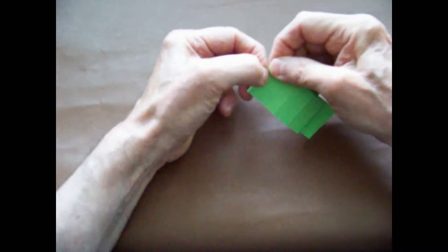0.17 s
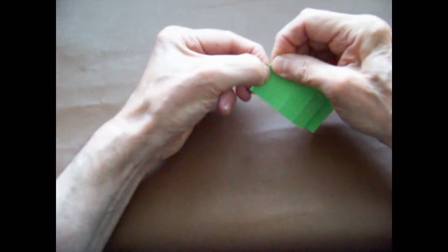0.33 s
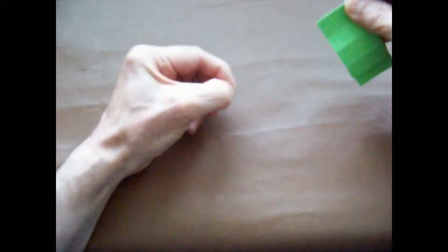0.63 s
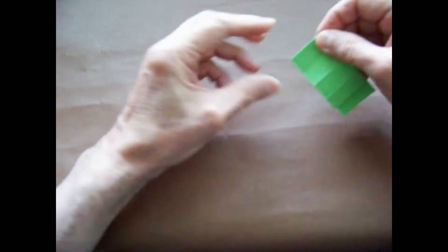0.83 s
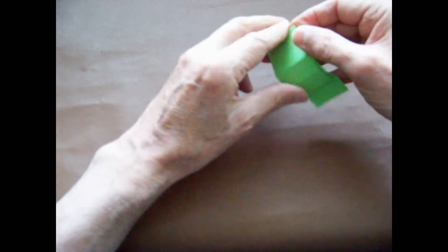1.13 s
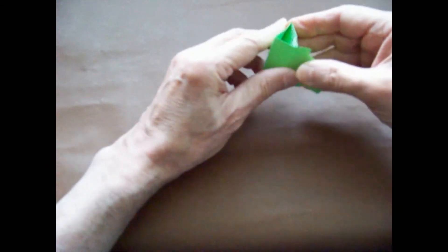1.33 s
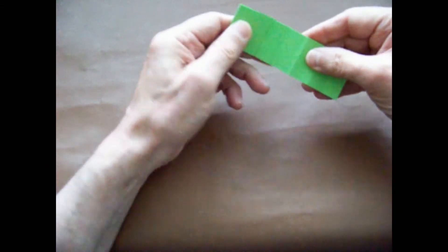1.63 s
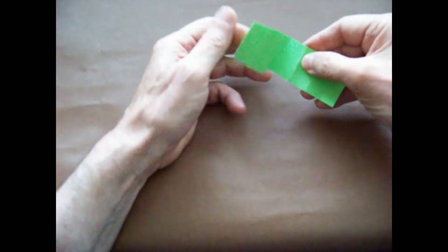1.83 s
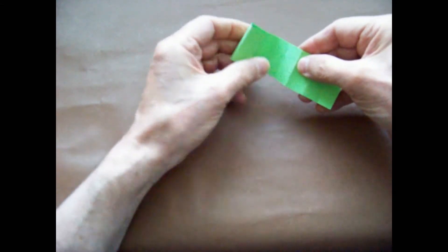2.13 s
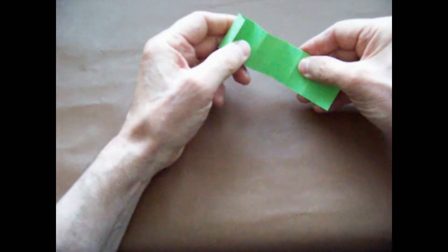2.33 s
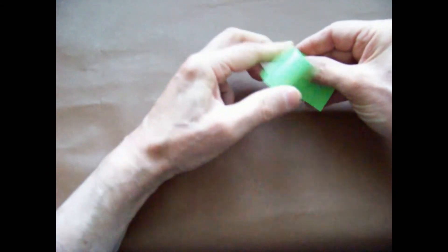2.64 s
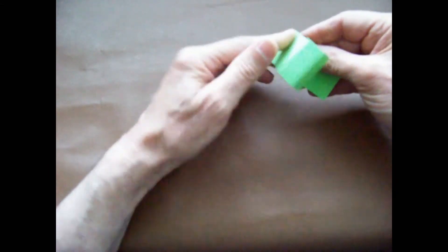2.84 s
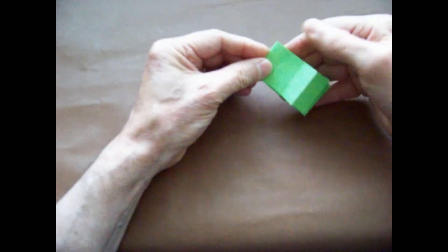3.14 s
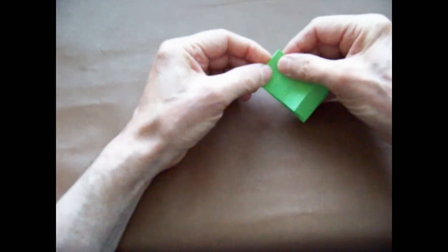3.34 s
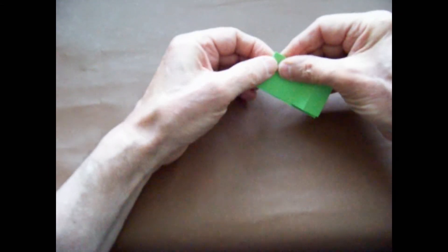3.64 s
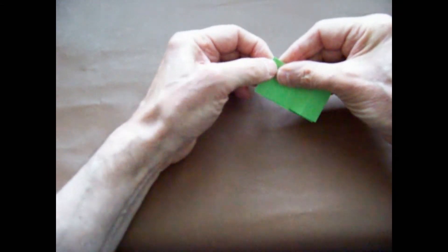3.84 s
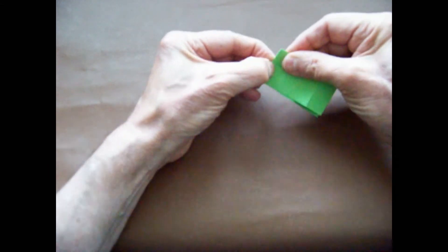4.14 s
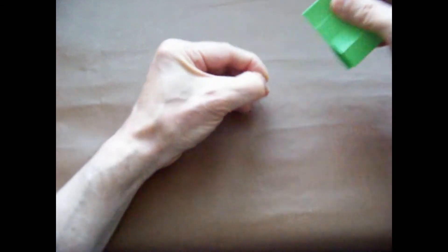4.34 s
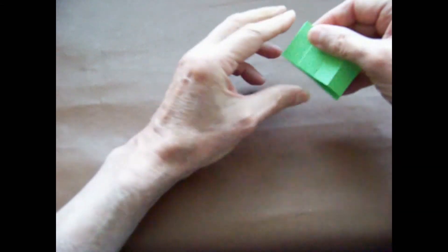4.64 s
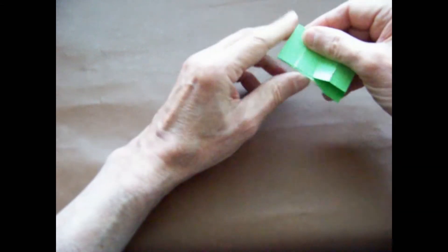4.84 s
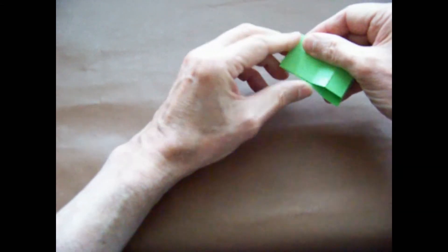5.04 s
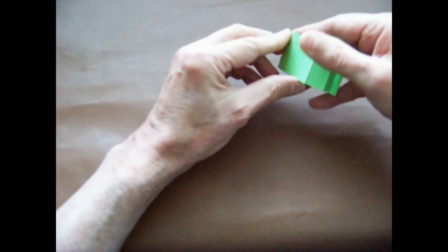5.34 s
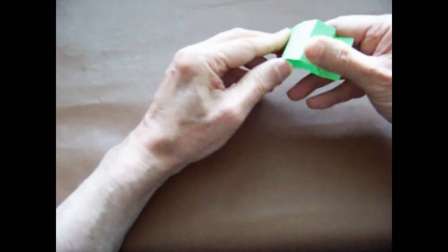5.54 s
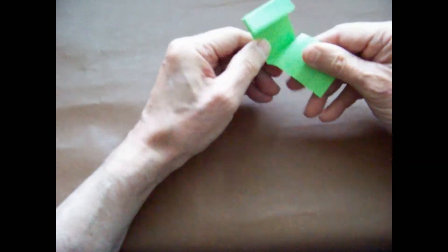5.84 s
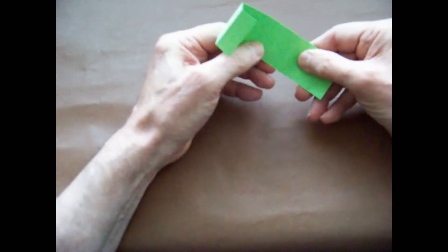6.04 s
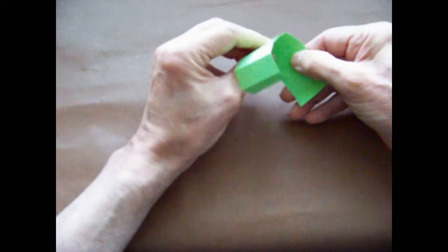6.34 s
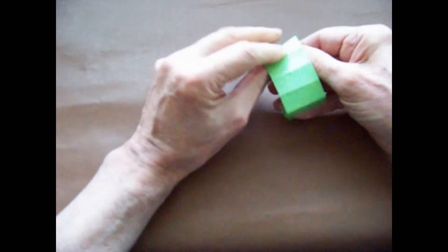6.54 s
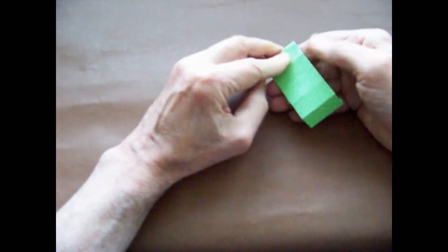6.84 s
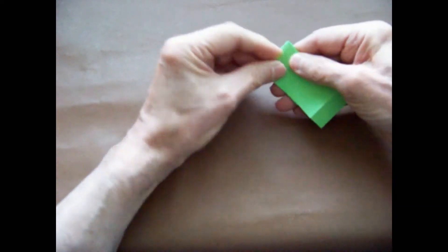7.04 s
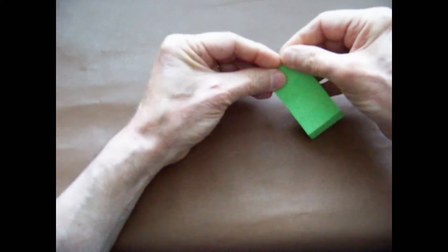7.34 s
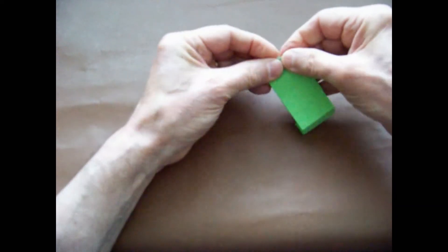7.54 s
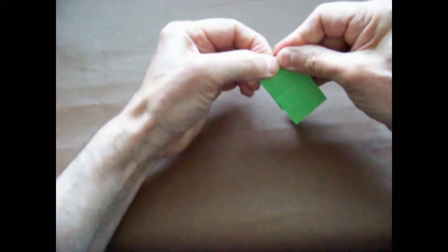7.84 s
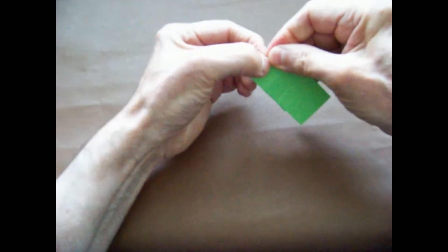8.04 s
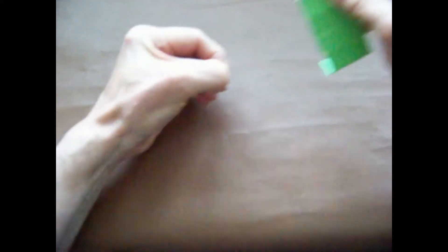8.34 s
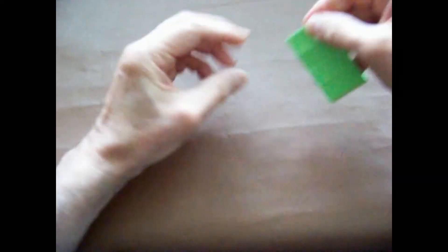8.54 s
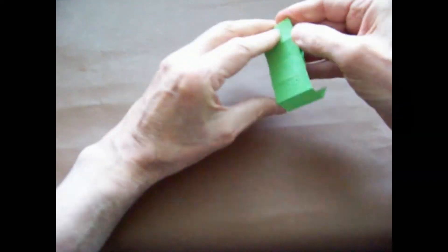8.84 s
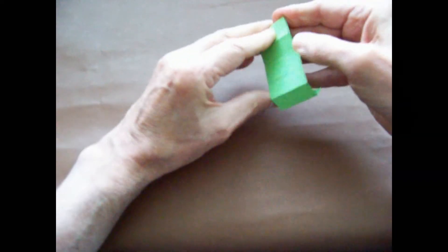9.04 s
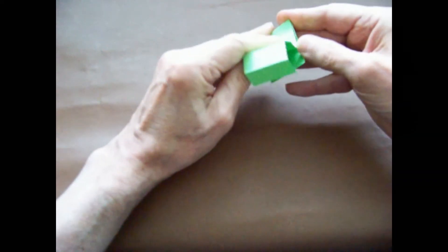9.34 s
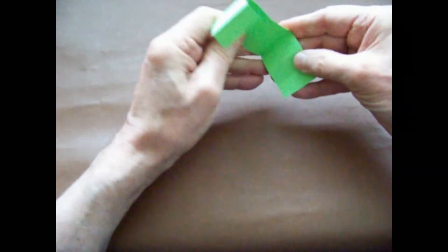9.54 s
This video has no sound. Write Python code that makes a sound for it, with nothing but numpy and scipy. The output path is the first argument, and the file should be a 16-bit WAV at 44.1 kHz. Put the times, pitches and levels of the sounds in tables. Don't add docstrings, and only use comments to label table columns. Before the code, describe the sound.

A small stiff card is folded by two hands, close to a stereo microphone in a quiet room with faint hiss, rumble and hum. Light gritty rubs and ticks open, with a crisp snap at 0.6 s and a soft low push just after. From 1.2 to 3 s fingers scrape and scuff, with small clicks near 1.6, 2.3 and 2.6. A loud bright crack lands at 3.2, then lighter ticks around 3.6. The sharpest snap comes at 4.35 with a low bump; another follows at 4.9, and a hard one at 5.64 amid brisk scuffs. Rustling and nail rubs continue to 6.7, a crack at 6.9, small crackly ticks from 7.3 to 7.8. A strong snap at 8.36 is followed by quieter handling, then a final crack at 9.54 trailing into a dry scuff. Echoes are short; the loudest snaps slightly overload.

```python
import sys
import numpy as np
from scipy import signal
from scipy.fft import rfft, irfft, next_fast_len
from scipy.io import wavfile
from scipy.ndimage import uniform_filter1d

SR = 44100
rng = np.random.default_rng(int(sys.argv[2]) if len(sys.argv) > 2 else 0)


def gain_from_db(level_db):
    decades = np.asarray(level_db, float) / 20
    return 10 ** decades


def transcribe(signal):
    frames = np.atleast_2d(signal).T
    limited = np.clip(frames, -1, 1)
    pcm = np.round(limited * 32767).astype(np.int16)
    wavfile.write(sys.argv[1], SR, pcm)


N = 426888


def rms_one(x):
    return x / np.sqrt(np.mean(x ** 2) + 1e-20)


def in_time(rows):
    s, *columns = np.transpose(rows)
    return [np.interp(np.arange(N) / SR, s, c) for c in columns]


def at_hz(points, hz):
    table = np.array(points)
    return np.interp(np.log(hz), np.log(table[:, 0]), table[:, 1])


def drift(rate_hz):
    r = np.exp(-80 * np.pi * rate_hz / SR)
    noise = rng.standard_normal(N // 40 + 2002)
    slow = signal.lfilter([1], [1, -2 * r, r * r], noise)[2000:]
    return np.interp(np.arange(N) / 40, np.arange(len(slow)), rms_one(slow))


def resonate(x, hz, width_hz):
    r = np.exp(-np.pi * width_hz / SR)
    zeros = np.array([1, 0, -1]) * (1 - r * r) / 2
    return signal.lfilter(zeros, [1, -2 * r * np.cos(2 * np.pi * hz / SR), r * r], x)


def body(x, modes):
    return sum((-1) ** k * gain_from_db(db) * resonate(x, hz, width) for k, (hz, width, db) in enumerate(modes))


def band(x, low_hz, high_hz):
    return signal.sosfilt(signal.butter(2, [low_hz, high_hz], "band", fs=SR, output="sos"), x)


def pair(mid, side, alike):
    alike = np.clip(alike, 0, 1)
    return np.sqrt(1 + alike) * mid + np.sqrt(1 - alike) * side * np.array([[1], [-1]])


# time_s, level_db
RUMBLE_CURVE = [(0.0, -72.5), (7.7, -71.5), (8.0, -69), (8.75, -66), (9.0, -71)]
# pitch_hz, density_db_per_hz
FLOOR_SPECTRUM = [(88, -32), (150, -8), (247, -15), (281, -50), (373, -6.5), (613, -8), (958, -7),
                  (1230, -11.5), (1330, -9.5), (5280, -16), (7850, -31.5), (10200, -64), (17300, -120)]
# pitch_hz, width_hz, level_db
HUM_LINES = [(54.7, 11, -77.5), (116.5, 4.4, -73.5), (186.3, 4.2, -72), (223.2, 8.2, -74.5)]
# pitch_hz, likeness_0to1
HISS_LIKENESS = [(60, 0.66), (200, 0.71), (670, 0.36), (2220, 0.14), (7400, 0.12)]
HISS_DB, RUMBLE_TRIM_DB = -60.5, 7.0


def stillness():
    hiss = 0
    edges_hz = 140 * 2 ** np.arange(0, 6.1, 1 / 3)
    white = rng.standard_normal((2, 2, N))
    for k, (low_hz, high_hz) in enumerate(zip(edges_hz, edges_hz[1:])):
        hz = np.sqrt(low_hz * high_hz)
        level_db = at_hz(FLOOR_SPECTRUM, min(hz, 5200)) + 1.6 * drift(13)
        hiss = hiss + gain_from_db(level_db) * pair(*band(white[k % 2], low_hz, high_hz), at_hz(HISS_LIKENESS, hz))
    rumble = pair(*band(rng.standard_normal((2, N)), 7, 130), 0.44)
    hum = 0
    for hz, width_hz, db in HUM_LINES:
        line = resonate(rng.standard_normal((2, N)), hz, width_hz)
        hum = hum + gain_from_db(db) * rms_one(pair(*line, 0.74))
    rumble_db = in_time(RUMBLE_CURVE)[0] + RUMBLE_TRIM_DB
    return gain_from_db(HISS_DB) * rms_one(hiss) + gain_from_db(rumble_db) * rms_one(rumble) + hum


# time_s, rub_db
GRIP_CURVE = [(0.0, -61.5), (0.95, -69), (1.15, -62), (2.1, -60), (2.5, -63), (2.9, -61), (3.3, -57),
              (3.65, -53.5), (3.8, -58), (4.15, -56), (4.4, -62.5), (6.1, -63), (7.25, -56), (7.95, -69),
              (8.08, -62), (8.25, -71), (9.0, -63), (9.68, -60.5)]
# let_go_s, top_db, length_s, nail_re_rub_db
DRAG_STROKES = [(0.071, -46, 0.042, -5), (0.282, -48.5, 0.18, -7), (0.516, -42.5, 0.032, -17),
                (1.295, -51, 0.12, -1.5), (1.622, -44.5, 0.023, 18.5), (1.873, -48.5, 0.095, 11.5),
                (1.961, -40.5, 0.048, -10), (2.606, -40.5, 0.038, -9), (2.798, -44.5, 0.081, -10),
                (3.112, -47, 0.17, 4), (4.366, -43, 0.19, 3.5), (4.912, -35, 0.051, -10),
                (5.222, -49, 0.13, -2), (5.295, -44, 0.052, 2.5), (5.629, -44, 0.064, 4),
                (5.813, -42.5, 0.062, 4), (6.036, -42.5, 0.12, -5), (6.065, -41, 0.031, -2),
                (5.938, -53, 0.03, -2.2), (6.407, -52, 0.038, -11), (6.914, -38, 0.045, 0),
                (7.183, -42.5, 0.064, 5), (7.358, -45, 0.08, 0.5), (7.449, -42.5, 0.068, -1),
                (7.716, -44.5, 0.065, -7), (7.84, -46, 0.047, -1), (8.981, -50, 0.052, -5),
                (9.528, -47.5, 0.2, -2), (9.547, -28.5, 0.032, -1)]
# start_s, top_db, fall_20db_s, flex_re_rub_db
SPRING_BACKS = [(0.284, -52.5, 0.13, -3), (0.7, -43, 0.16, 2), (0.811, -47, 0.07, 7.5),
                (2.302, -44.5, 0.0357, 8), (2.606, -35.5, 0.06, -4.5), (3.175, -38, 0.12, -14),
                (3.706, -50, 0.07, 8.5), (4.347, -36.5, 0.17, -1.5), (4.91, -36.5, 0.0563, -1),
                (5.657, -50, 0.6, -5), (6.914, -59, 0.9, 0), (7.034, -46, 0.07, -5), (7.448, -45, 0.03, 7),
                (7.723, -62, 0.3, 9), (7.826, -52, 0.08, 1), (8.365, -39.5, 0.12, -4),
                (8.483, -49.5, 0.18, -7.5), (8.783, -42, 0.05, -8), (9.086, -50.5, 0.13, -6.5),
                (9.548, -42.5, 0.12, -6.5)]
# start_s, level_db, length_s, flex_re_rub_db, nail_re_rub_db
EDGE_SLIDES = [(0.376, -49.5, 0.011, -16, -7), (0.393, -49, 0.007, -16, -5), (0.402, -46, 0.0073, -15, -11),
               (0.544, -44.5, 0.18, -8.5, -5), (1.295, -48.5, 0.073, -14, -1), (1.392, -41, 0.024, -22, -3),
               (1.413, -41.5, 0.2, -16, -5), (1.619, -53.5, 0.15, -13, -3.5),
               (1.943, -53.5, 0.11, -1.5, -4), (2.142, -55.5, 0.095, -1.5, -1.5),
               (3.13, -58.5, 0.036, 3, -14), (4.576, -61, 0.1, 6.5, -14), (4.663, -53.5, 0.1, -9, -3),
               (5.29, -50.5, 0.071, -7, -10), (5.367, -58, 0.17, -27, -8), (5.621, -32.5, 0.032, -23, -4),
               (5.81, -60, 0.054, 2, -10), (5.854, -38, 0.057, -15, -1), (6.226, -54.5, 0.11, -9, -1.5),
               (6.398, -49, 0.071, -7, -1.5), (6.478, -47, 0.11, -9.5, -10), (6.654, -49, 0.032, -12, -10),
               (6.785, -43.5, 0.091, -13.5, -2), (7.527, -48.5, 0.11, -5.5, -4),
               (8.289, -41, 0.079, -14, -1.3), (9.62, -51, .08, -10, 0.5)]
GRIP_FLEX_DB, GRIP_NAIL_DB = -2.5, -3
DRAG_RISE_DB, DRAG_FLEX_DB, SETTLE_NAIL_DB = 11.5, -10, -4


def strokes():
    t = np.arange(N) / SR
    power = gain_from_db(2 * (in_time(GRIP_CURVE)[0] + np.array([[0], [GRIP_FLEX_DB], [GRIP_NAIL_DB]])))
    ramps = [(s - length, length, db - DRAG_RISE_DB, db, DRAG_FLEX_DB, nail)
             for s, db, length, nail in DRAG_STROKES]
    ramps += [(s, 2 * fall_s, db, db - 2 * 20, flex, SETTLE_NAIL_DB) for s, db, fall_s, flex in SPRING_BACKS]
    ramps += [(s, length, db, db, flex, nail) for s, db, length, flex, nail in EDGE_SLIDES]
    for s, length_s, start_db, end_db, flex_db, nail_db in ramps:
        on = slice(max(round(s * SR), 0), max(round((s + length_s) * SR), 0))
        rub_db = start_db + (end_db - start_db) * (t[on] - s) / length_s
        power[:, on] += gain_from_db(2 * (rub_db + np.array([[0], [flex_db], [nail_db]])))
    rub_db, sheet_db, nail_db = uniform_filter1d(10 * np.log10(power), size=260, axis=1)
    return rub_db, sheet_db - rub_db, nail_db - rub_db


def crackle():
    sizes = gain_from_db(3.5 * np.minimum(rng.exponential(1, N), 4)) * rng.choice([-1, 1], N)
    pops = uniform_filter1d(sizes * (rng.random(N) < 450 / SR), size=3)
    patches_hz = np.geomspace(1300, 6500, 12)
    dealt = np.repeat(rng.integers(0, 12, N // 64 + 1), 64)[:N]
    return rms_one(sum(resonate(pops * (dealt == k) + 1e-18, hz, .11 * hz) for k, hz in enumerate(patches_hz)))


# pitch_hz, width_hz, level_db
CARD_MODES = [(2840, 1666, 10.5), (3291, 2085, 12.5), (4800, 3260, 10), (6100, 4350, 5)]
# pitch_hz, width_hz, level_db
SHEET_MODES = [(190, 480, -15.5), (464, 100, -22), (760, 450, 5.5), (1050, 1070, 8.5), (1597, 1220, 5)]


def rubbing():
    rub_db, flex_db, nail_db = strokes()
    sizes = gain_from_db(0.3 * np.minimum(rng.exponential(1, N), 5))
    caught = rng.random(N) < 7000 / SR
    grit = pair(*rng.standard_normal((2, N)), 0.44) * (sizes * caught + 0.48)
    grit = rms_one(grit) * gain_from_db(1.6 * drift(60))

    def ring(modes):
        return rms_one(sum(gain_from_db(db + 3.2 * drift(26)) * resonate(grit, hz, .6 * width) for hz, width, db in modes))

    dull_db = 10 * np.log10(np.clip(1 - gain_from_db(2 * nail_db), .1, 1))
    panels = gain_from_db(dull_db) * ring(CARD_MODES[:2]) + gain_from_db(nail_db - 0.16) * ring(CARD_MODES[2:])
    for low_hz in (2180, 2180, 2000):
        panels = band(panels, low_hz, 22000)
    sound = panels + gain_from_db(flex_db + 0.3) * band(ring(SHEET_MODES), 120, 5200)
    pops = crackle()
    sound = sound + gain_from_db(-9.0) * band(pops, 2500, 9000) + gain_from_db(flex_db - 7.0) * band(pops, 600, 3000)
    return gain_from_db(rub_db - 0.1) * sound * gain_from_db(np.array([[1.3], [-1.3]]))


# start_s, peak_db, ring_hz, buckle_ms
SLOW_SLIPS = [(0.056, -41, 1840, 1.14), (0.243, -40.5, 5400, 4.1), (0.262, -44, 5570, 2.9),
              (0.492, -40, 2290, 3.7), (0.745, -35, 3000, 4.4), (0.6137, -25.5, 4100, 2.5),
              (1.619, -26, 4150, 4.12), (2.075, -45, 1800, 3.8), (2.622, -24, 2780, 4.3),
              (2.775, -41.5, 3350, 3.8), (3.178, -15, 2690, 4.9), (3.357, -33.5, 3100, 3.3),
              (3.725, -43, 4630, 4.2), (4.505, -39.5, 4170, 4.9), (4.834, -46.5, 4350, 1.6),
              (4.928, -23, 3320, 3.5), (5.195, -42.5, 2560, 2.8), (5.633, -23, 3000, 5.6),
              (5.65, -25, 4370, 3.4), (5.773, -29.5, 3080, 3.6), (5.828, -35, 3570, 1.1),
              (5.924, -38, 3030, 2), (6.907, -32, 5900, 3.8), (7.044, -36.5, 1400, 2.55),
              (7.434, -27, 6170, 3.7), (7.5432, -36, 2000, 0.95), (7.641, -28, 6270, 4.7)]
# start_s, peak_db, ring_hz, ring_re_crack_db, buckle_ms
CREASE_CRACKS = [(0.547, -29.5, 1380, -3, 1.9), (1.6094, -26.5, 6100, -2, 4.4), (2.05, -40.5, 1520, 2, 2.8),
                 (2.155, -28.5, 2650, 1, 2.3), (2.583, -33.5, 1350, 3.5, 2.3), (3.174, -12.5, 2620, 5, 2.2),
                 (3.219, -15, 5020, -20, 1.1), (3.2456, -25.5, 2440, -2, 1.33), (3.35, -30, 1230, 0, 1.95),
                 (4.168, -34, 5170, -27, 2.7), (4.35, -19.5, 5450, -3.5, 2.7), (4.7335, -38, 4800, 4, 2.8),
                 (4.914, -16.5, 1490, 0.5, 1.53), (5.311, -31, 2160, -10.5, 1.23),
                 (5.328, -35, 2180, -5, 2.6), (5.6226, -26.5, 2860, 3, 0.97), (5.638, -15.5, 3680, 4, 1.65),
                 (6.645, -44.5, 1450, 2, 2.3), (6.868, -19, 2940, -7, 6.0), (7.342, -36.5, 4570, -2, 8.0),
                 (7.372, -27, 3060, -6, 10.7), (7.531, -37, 3320, 0, 3.4), (7.69, -37, 5450, 1, 4.4),
                 (7.806, -38, 6300, 2, 3.2), (8.362, -18, 760, -13.5, 2.73), (8.84, -42, 1430, -4, 2.7)]
# start_s, peak_db, ring_hz, ring_re_crack_db, buckle_ms
PANEL_TICKS = [(0.381, -40, 3420, 4, 2.45), (0.475, -46, 3500, 6, 2.3), (0.613, -19.5, 6200, 14, 2.2),
               (1.398, -40, 3300, 7, 2.6), (1.891, -40, 5070, 6, 2.3), (3.608, -31, 4440, 3, 3.3),
               (3.667, -29.5, 2960, 20, 1.6), (4.295, -25, 4200, 13, 4), (4.546, -38.5, 3680, 3.5, 1.2),
               (4.577, -38, 1760, 18, 2.2), (4.667, -39, 4440, 12, 2), (4.688, -33.5, 4440, 7, 2.3),
               (4.989, -26.5, 4400, -1, 3.8), (5.282, -31.5, 4770, 4.5, 2.35), (5.741, -31, 4440, 5, 2.5),
               (5.8043, -25.5, 3620, 14, 4.6), (6.7105, -28.5, 4680, 12, 1.1), (7.031, -37, 3300, 6, 2),
               (7.429, -27, 6640, 8, 5.3), (7.577, -32.5, 3300, 8, 0.83), (7.631, -27, 6600, 4, 5.3),
               (9.516, -43, 4800, 7, 1.5)]
# start_s, peak_db, ring_hz, thump_re_ring_db
SHEET_THUDS = [(0.31, -39, 1390, 11), (0.689, -34, 2330, -6), (0.811, -43, 2340, -4),
               (2.301, -23.5, 2580, -8.5), (2.545, -37, 5770, -6.5), (3.037, -40.5, 5400, -1),
               (3.142, -39, 3440, -8), (3.653, -34, 2840, 0), (3.703, -32, 1560, 10),
               (4.209, -37, 2890, -4), (4.8757, -28.5, 5660, -6.5), (5.112, -39.5, 4700, -3),
               (5.237, -36, 2310, 7), (5.575, -35.5, 3820, -15), (5.761, -32, 3550, -23),
               (5.784, -28.5, 3300, -11), (5.862, -35.5, 6040, -7.5), (6.343, -39, 1950, 7),
               (6.486, -41, 1430, -2.5), (7.133, -39, 6000, -5.5), (7.256, -42.5, 1810, 0),
               (7.725, -35, 2780, -0.5), (7.824, -29, 2100, -3.5), (8.119, -44, 1410, 0),
               (8.285, -31.5, 2940, -4), (8.783, -42, 3380, -5), (8.959, -40, 1260, 11),
               (9.536, -23.5, 5100, -15)]
SLIP_THUMP_DB, SLIP_RING_DB = -21, -0.5
CRACK_THUMP_DB, TICK_THUMP_DB = -24, -18
THUD_MS, THUD_RING_DB = 2.3, 4.5


def buckles():
    slips = [(s, db, hz, SLIP_THUMP_DB, ms, SLIP_RING_DB) for s, db, hz, ms in SLOW_SLIPS]
    quick = [(s, db, hz, CRACK_THUMP_DB, ms, ring) for s, db, hz, ring, ms in CREASE_CRACKS]
    quick += [(s, db, hz, TICK_THUMP_DB, ms, ring) for s, db, hz, ring, ms in PANEL_TICKS]
    quick += [(s, db, hz, thump, THUD_MS, THUD_RING_DB) for s, db, hz, thump in SHEET_THUDS]
    return slips + sorted(quick)


def snaps():
    size, rows = 2048, buckles()
    out = np.zeros((2, N + size))
    t_ms = np.arange(size) * 1000 / SR
    fibres = rng.standard_normal((len(rows), 2, size)) * (.5 + rng.exponential(1, (len(rows), 1, size)))
    pans_db = 4.8 + 1.0 * rng.standard_normal(len(rows))
    buckle = t_ms / np.clip(np.array(rows)[:, 4, None, None], .3, 20)
    forces = np.array([pair(mid, side, 0.72) for mid, side in fibres])
    forces = forces * buckle ** 1.28 * np.exp(-buckle / 0.47)
    cards = body(forces, CARD_MODES)
    sheets = band(body(forces, SHEET_MODES), 150, 4800)
    sounds = []
    for (_, _, hz, thump_db, _, ring_db), force, card, sheet in zip(rows, forces, cards, sheets):
        panel = ring_on(lambda ms: force, hz, 0, 500 + 0.15 * hz)
        crack = rms_one(gain_from_db(ring_db) * rms_one(panel) + rms_one(card))
        sounds.append(crack + gain_from_db(thump_db) * rms_one(sheet))
    sounds = band(np.array(sounds), 60, 7600)
    for (s, db, _, _, buckle_ms, _), sound, pan_db in zip(rows, sounds, pans_db):
        at = max(round((s - .0003 * buckle_ms) * SR) - 8, 0)
        level = gain_from_db(db + 4.0) / np.abs(sound.mean(axis=0)).max()
        out[:, at:at + size] += level * sound * gain_from_db(np.array([[.5], [-.5]]) * pan_db)
    return out[:, :N]


# start_s, peak_db, push_ms
LOW_PUSHES = [
    (0.612, -49, 2.4),
    (0.73, -46, 13),
    (0.817, -51, 6.5),
    (3.175, -45, 3.1),
    (4.347, -44, 3.4),
    (4.386, -42.5, 5.3),
    (4.42, -51, 6.1),
    (5.638, -53, 3.6),
]


def bumps():
    size = 4096
    out, t_ms = np.zeros(N + size), np.arange(size) * 1000 / SR
    for (s, db, ms), noise in zip(LOW_PUSHES, rng.standard_normal((len(LOW_PUSHES), size))):
        lump = band((0.35 + noise) * t_ms / ms * np.exp(-t_ms / ms), 65, 420)
        at = round(s * SR)
        out[at:at + size] += gain_from_db(db) * lump / np.abs(lump).max()
    return out[:N]


def struck(rows, voice):
    size = 4096
    out, t_ms = np.zeros((2, N + size)), np.arange(size) * 1000 / SR
    for (s, db, *build), (mid, side) in zip(rows, rng.standard_normal((len(rows), 2, size))):
        sound = voice(lambda ms: pair(mid, side, 0.59) * np.exp(-t_ms / max(ms, .1)) + 1e-18, *build)
        at = round(s * SR)
        out[:, at:at + size] += gain_from_db(db) * sound / np.abs(sound.mean(axis=0)).max()
    return out[:, :N] * gain_from_db(np.array([[2.0], [-2.0]]))


# start_s, peak_db, decay_ms
SUDDEN_BREAKS = [(0.6125, -15.5, 0.79), (4.877, -20.5, .5), (3.89, -32, .9), (3.1605, -38, 0.72),
                 (3.1745, -8.5, 1.6), (3.6705, -29.5, 0.24), (4.2975, -21.5, 0.55), (4.3495, -4, 0.46),
                 (4.4065, -35.5, .6), (4.7405, -34, .5), (4.9142, -19.5, .6), (5.2385, -29, .6),
                 (5.6378, -7, 0.41), (5.652, -26, 0.36), (6.871, -14, 0.73), (7.133, -34, .4),
                 (7.438, -23, 0.44), (8.287, -21, 0.46), (8.3612, -7.5, 0.74), (9.5355, -13, 0.44)]
SNICK_THUMP_DB = -16


def snick(force, ms):
    sheet = rms_one(body(force(ms), SHEET_MODES))
    return rms_one(body(force(ms), CARD_MODES)) + gain_from_db(SNICK_THUMP_DB) * sheet


# start_s, peak_db, pitch_hz, decay_ms, width_hz
PANEL_RINGS = [(0.819, -27.5, 2600, 3.9, 1500), (0.83, -43.5, 650, 46, 350), (3.175, -16.5, 5100, 5.1, 700),
               (3.185, -30, 2660, 20, 500), (3.606, -23.5, 4620, 2.6, 500), (3.647, -33.5, 2770, 5.9, 1600),
               (3.7035, -27, 1600, 2.1, 1200), (3.726, -35.5, 4830, 2.2, 500),
               (4.58, -34.5, 2700, 2.8, 1400), (3.97, -39, 3500, 1.5, 3000), (3.526, -39, 2000, 2.4, 2000),
               (4.682, -35, 4600, 7.0, 1100), (5.279, -33, 4800, 4.5, 450), (5.289, -39, 4800, 4.0, 600),
               (5.299, -36, 4700, 4.0, 800), (5.317, -37, 4230, 4.0, 400), (5.331, -29, 4400, 2.2, 900),
               (5.641, -30.5, 990, 8.9, 300), (7.377, -28.5, 6560, 6.5, 895), (7.384, -32, 4570, 4.0, 1500),
               (7.829, -42.5, 1020, 30.0, 150), (7.83, -34, 4000, 3.0, 700),
               (8.3615, -13.5, 4640, 1.9, 900), (9.536, -31.5, 754, 6.4, 350), (5.636, -20, 2980, 4.0, 600),
               (6.869, -24.5, 1050, 6.6, 397), (4.9145, -18, 3280, 2.0, 1190),
               (6.483, -37, 3000, 5.0, 2000), (8.316, -39, 3120, 40.0, 800)]


def ring_on(force, hz, ms, width_hz):
    return resonate(resonate(force(ms), hz, width_hz), hz, width_hz)


# start_s, peak_db, pitch_hz, length_ms, width_hz
PATCH_SCUFFS = [(1.21, -42, 5900, 30, 1200), (1.292, -43, 6300, 41, 1800), (1.3, -40, 2980, 30, 1200),
                (1.345, -44, 3200, 32, 1500), (1.418, -33, 6250, 34, 2200), (1.43, -37, 1300, 5, 1800),
                (1.498, -33, 3100, 30, 1500), (1.578, -33, 6000, 25, 2000), (1.775, -43, 5800, 48, 2000),
                (1.918, -37, 6260, 36, 2000), (1.94, -40, 1300, 34, 900), (2.17, -44, 6300, 23, 1500),
                (2.578, -33, 6160, 66, 1300), (2.582, -38, 1450, 36, 700), (2.76, -43.5, 1390, 27, 700),
                (2.765, -38, 4300, 20, 1200), (2.962, -39.5, 6160, 32, 1500), (3.052, -41, 5800, 87, 1800),
                (3.135, -45, 6260, 19, 900), (4.995, -46, 4420, 57, 300), (5.452, -46, 4200, 14, 1200),
                (5.48, -46, 4300, 10, 900), (5.572, -45.5, 1080, 51, 500), (5.765, -41, 1300, 27, 600),
                (5.799, -28.5, 7100, 15, 800), (5.855, -31.5, 5740, 67, 1400), (5.86, -38.5, 1400, 48, 700),
                (5.962, -40.5, 6300, 45, 1800), (6.043, -39, 6200, 25, 1200), (6.12, -45, 1600, 8.5, 1600),
                (7.605, -40, 6370, 26, 900), (7.7, -42, 5600, 13, 2500), (7.776, -41.5, 5500, 15, 2200),
                (8.36, -15, 6740, 6.3, 1600), (9.085, -46, 6600, 53, 1500), (9.175, -44, 5500, 74, 3000),
                (9.54, -32.5, 5600, 31, 1800), (9.61, -35.5, 5800, 83, 1800), (6.706, -39, 3880, 76, 3000),
                (6.641, -42, 1420, 20, 400)]


def scuff(force, hz, ms, width_hz):
    steady = force(np.inf)
    swell = np.sin(np.pi * np.clip(np.arange(steady.shape[1]) * 1000 / SR / ms, 0, 1))
    return ring_on(lambda _: steady * swell + 1e-18, hz, ms, width_hz)


# delay_s, level_db
NEAR_ECHOES = [(.0039, -19), (.0075, -23), (0.011, -22)]
ROOM_T60_S, ROOM_DB, WALL_CUT_HZ = 0.22, -16.5, 5700


def room(x):
    size, t = next_fast_len(N + SR), np.arange(SR // 2) / SR
    tail = band(rng.standard_normal((2, len(t))), 250, WALL_CUT_HZ) * gain_from_db(-60 * t / ROOM_T60_S)
    tail *= 1 - np.exp(-t / 0.0064)
    answer = gain_from_db(ROOM_DB) * rms_one(tail) / np.sqrt(len(t))
    answer[:, 0] += 1
    for s, db in NEAR_ECHOES:
        answer[:, round(s * SR)] += gain_from_db(db)
    return irfft(rfft(x, size) * rfft(answer, size), size)[:, :N]


def scene():
    card = rubbing() + snaps()
    card = card + struck(SUDDEN_BREAKS, snick) + struck(PANEL_RINGS, ring_on) + struck(PATCH_SCUFFS, scuff)
    card[1] = np.roll(card[1], 1)
    return room(card) + stillness() + bumps()


def roll_off(x):
    return signal.sosfilt(signal.butter(12, 16000, fs=SR, output="sos"), x)


# pitch_hz, width_hz
HOUSING_NOTCHES = [(982, 41), (300, 89)]
PORTS_ALIKE_HZ, PORTS_ALIKE = 1300, 0.35
CUTOFF_HZ, CLIP_LEVEL, KNEE = 8100, .57, 8.0


def record(dry):
    side = (dry[0] - dry[1]) / 2
    low_side = signal.sosfilt(signal.butter(1, PORTS_ALIKE_HZ, fs=SR, output="sos"), side)
    x = dry - PORTS_ALIKE * low_side * np.array([[1], [-1]])
    for hz, width_hz in HOUSING_NOTCHES:
        x = x - 1.2 * resonate(x, hz, width_hz)
    x = signal.sosfilt(signal.cheby2(16, 60, CUTOFF_HZ, fs=SR, output="sos"), x)
    x = x / (1.5 + np.abs(x / CLIP_LEVEL) ** KNEE) ** (1 / KNEE)
    x = signal.sosfilt(signal.butter(8, 15500, fs=SR, output="sos"), x)
    return roll_off(x)


dry = scene()
out = record(dry)
transcribe(out)
```